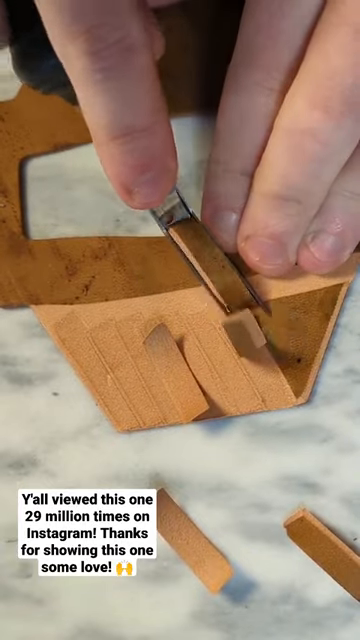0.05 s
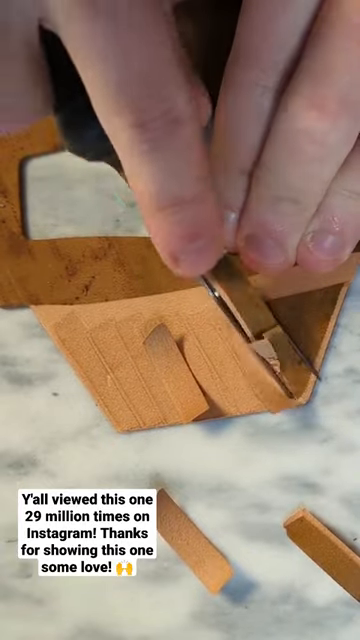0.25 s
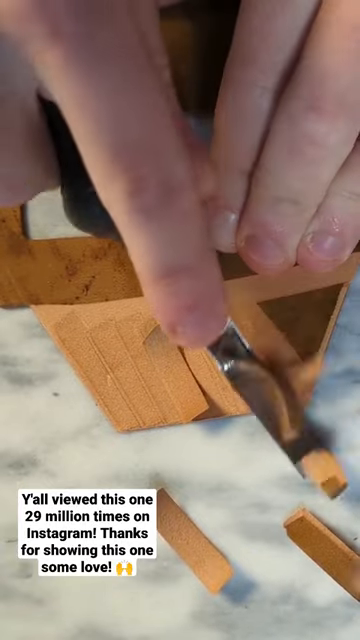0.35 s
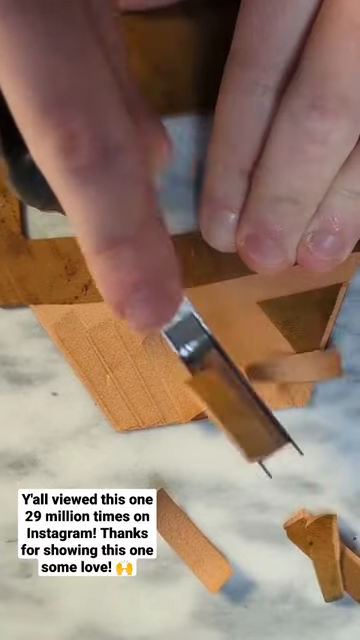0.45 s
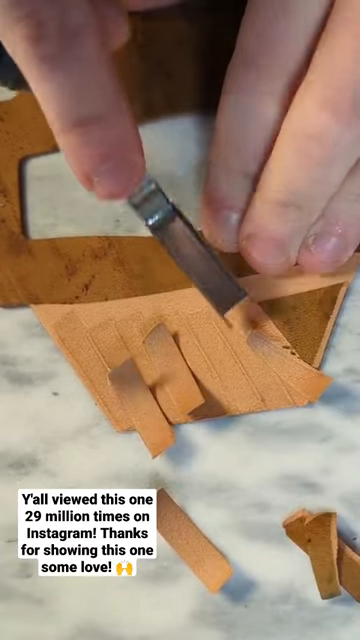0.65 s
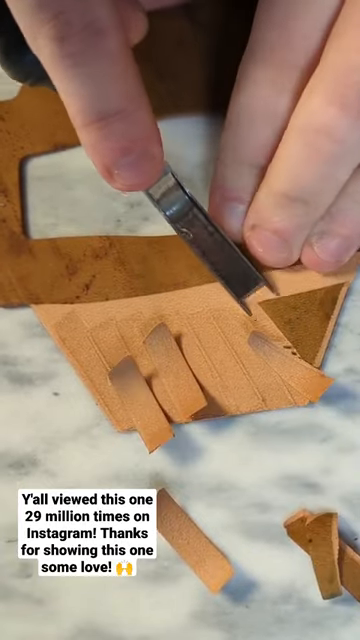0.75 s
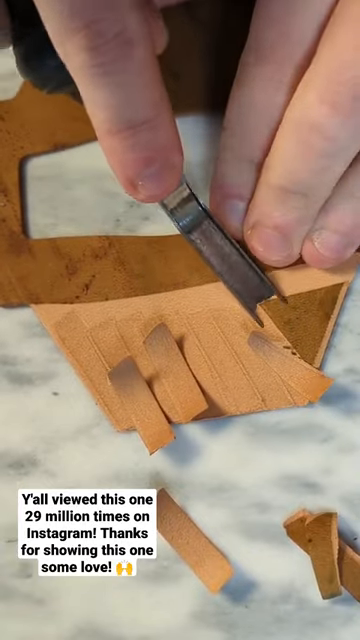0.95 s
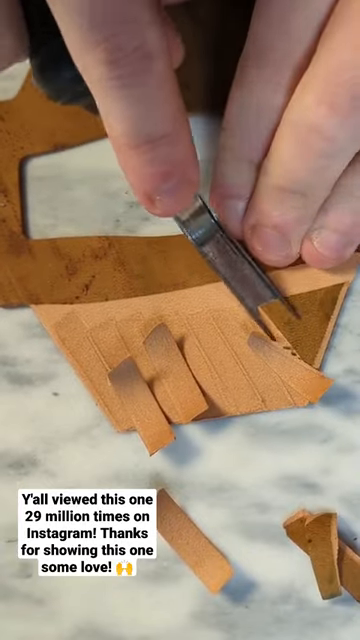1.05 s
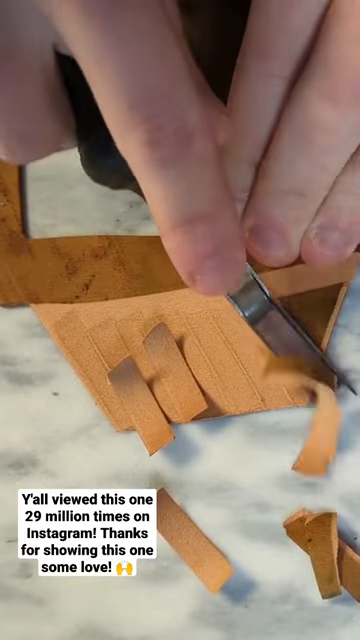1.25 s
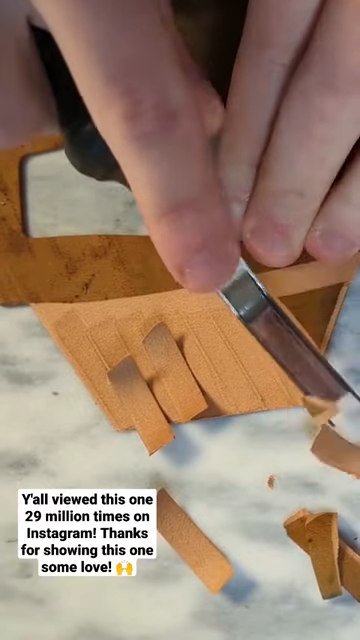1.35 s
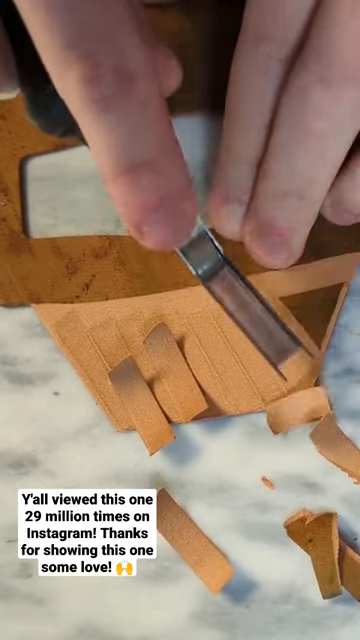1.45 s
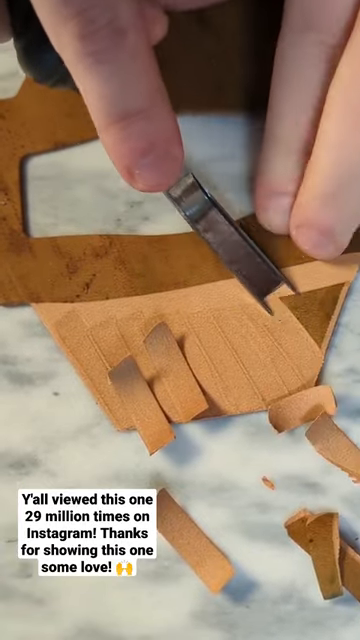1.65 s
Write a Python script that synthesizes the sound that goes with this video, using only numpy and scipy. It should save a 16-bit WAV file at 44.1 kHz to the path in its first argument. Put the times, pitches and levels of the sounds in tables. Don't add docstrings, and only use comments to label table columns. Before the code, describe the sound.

Two rasping pushes of a sharp blade cutting leather on a stone slab, ringing faintly

```python
import sys
import numpy as np
from scipy import signal
from scipy.fft import rfft, irfft
from scipy.io import wavfile

SR = 44100
rng = np.random.default_rng(int(sys.argv[2]) if len(sys.argv) > 2 else 0)


def volts_from_db(level):
    exponent = np.asarray(level, float) / 20
    return 10 ** exponent


def inscribe(sig):
    pcm = np.round(np.clip(np.atleast_2d(sig).T, -1, 1) * 32767)
    wavfile.write(sys.argv[1], SR, pcm.astype(np.int16))


N = 74970
T = np.arange(N) / SR

SLAB_PITCHES = [578, 612, 695, 980, 1325, 1526, 1575, 1865, 1964, 2112, 2840, 3025, 3066, 3280]
# [level/dB, t60/s]
SLAB_MODES = [(-13, 0.061), (-10, 0.048), (-17.5, 0.033), (-21, 0.063), (-21.5, 0.13), (-9, 0.083),
              (-11, 0.063), (-18, 0.067), (-24, 0.3), (-31, 0.05), (-28.5, 0.035), (-21.5, 0.082),
              (-21, 0.072), (-24.5, 0.02)]
BLADE_PITCHES = [4645, 6050, 7715, 8905, 9105, 9445, 10600, 12300]
# [level/dB, t60/s]
BLADE_MODES = [(-7.5, 0.09), (-6.5, 0.061), (-8.5, 0.05), (-13.5, 0.07), (-2.5, 0.043), (-7.5, .07),
               (-9, 0.034), (-1, 0.0056)]
# [f/Hz, density/dB per Hz]
HISS_COLOUR = [(560, -5), (1500, 4), (2600, 1), (4000, -3.5), (8500, -4.5), (10100, -11), (12500, -6),
               (14100, -14)]
HISS_DB, BLADE_DB = 7, -3
EDGE_HZ = 14150


def rms_one(x):
    return x / np.sqrt(np.mean(x ** 2) + 1e-20)


def cut(x, hz, kind, order=2):
    return signal.sosfilt(signal.butter(order, np.clip(hz, 10, .45 * SR), kind, fs=SR, output="sos"), x)


def steep(x, hz):
    return signal.sosfilt(signal.ellip(10, .5, 55, hz, fs=SR, output="sos"), x)


def drift(hz):
    return rms_one(cut(rng.standard_normal(N + 9999), hz, "low")[9999:])


def colour(x, points):
    hz = np.maximum(np.arange(N // 2 + 1) * SR / N, 1)
    p = np.array(points)
    gain = volts_from_db(np.interp(np.log(hz), np.log(p[:, 0]), p[:, 1]))
    gain = gain * np.minimum(hz / p[0, 0], 1) ** 4.1
    return irfft(rfft(x) * gain / np.sqrt(np.mean(gain ** 2)), N)


def ring(force, pitches, modes):
    out = np.zeros(N)
    for k, (hz, (db, t60)) in enumerate(zip(pitches, modes)):
        r = volts_from_db(-60 / (t60 * SR))
        w = 2 * np.pi * hz / SR
        b = (1 - r * r) ** .5 * 2 ** .5 * np.sin(w) * volts_from_db(db) * (-1) ** k
        out += signal.lfilter([0, b], [1, -2 * r * np.cos(w), r * r], force + 1e-18)
    return out


def rumble():
    # [f/Hz, density/dB per Hz]
    murmur_colour = [(45, -12), (70, 1), (240, -4), (560, -20), (1000, -25), (3000, -30.5), (8000, -45),
                     (15600, -51.5)]
    hum_hz, hum_width_hz, hum_db = 240.8, 4.7, -76
    hum_band = [hum_hz - hum_width_hz / 2, hum_hz + hum_width_hz / 2]
    hum = rms_one(cut(rng.standard_normal(N), hum_band, "band"))
    murmur = rms_one(colour(rng.standard_normal(N), murmur_colour))
    sway = volts_from_db(.8 * drift(hz=5))
    return volts_from_db(-59.5) * murmur * sway + volts_from_db(hum_db) * hum


def tearing():
    tears_per_s, spread_db, flutter_db, flutter_hz = 5000, 2.2, 0.5, 40
    sizes = volts_from_db(spread_db * np.minimum(rng.exponential(1, N), 5)) * rng.choice([-1, 1], N)
    snaps = rng.random(N) < tears_per_s / SR
    return rms_one(sizes * snaps * volts_from_db(flutter_db * drift(flutter_hz)))


def stroke_gain(axis):
    # [t/s, cutting effort/dB, pressure on the slab/dB]
    strokes = [
        [(0.13, -110, -83), (0.178, -88, -56), (0.222, -74.5, -48.5), (0.298, -67, -44.5), (0.348, -65.5, -42),
         (0.386, -63.5, -42.5), (0.452, -63, -40), (0.468, -60, -54), (0.476, -67, -37)],
        [(1.07, -103, -74.5), (1.156, -80.5, -49), (1.164, -82, -56), (1.256, -64.5, -39), (1.274, -65, -42),
         (1.314, -64, -42), (1.364, -63.5, -43), (1.374, -62.5, -48.5), (1.44, -84.5, -63.5)],
    ]
    total = 0
    for stroke in strokes:
        points = np.array(stroke)
        total = total + volts_from_db(np.interp(T, points[:, 0], points[:, axis], left=-200, right=-200))
    return total


def cutting():
    effort, pressure = stroke_gain(axis=1), stroke_gain(axis=2)
    hiss = volts_from_db(HISS_DB) * effort * colour(tearing(), HISS_COLOUR)
    blade = volts_from_db(BLADE_DB) * ring(effort * tearing(), BLADE_PITCHES, BLADE_MODES)
    slab = ring(pressure * tearing(), SLAB_PITCHES, SLAB_MODES)
    return hiss + blade + volts_from_db(2.57) * cut(slab, 530, "high", order=4)


def catches():
    # [slab mode number, level over the pressure/dB]
    singing = [(4, -14), (5, -20.5), (7, -12), (8, -17.5), (11, -22.5)]
    # [t/s, slab mode number, peak level/dB, t60/s]
    snags = [(0.17, 1, -50, 0.087), (0.29, 5, -34, 0.11), (0.365, 5, -35.5, 0.45), (0.398, 5, -43, 0.048),
             (0.457, 5, -33.5, 0.47), (0.251, 11, -52.5, 0.18), (0.21, 5, -56, 0.076),
             (0.201, 7, -52.5, 0.9), (0.262, 5, -46, 0.14), (0.33, 5, -34, 0.045), (0.4, 7, -44, 0.27),
             (0.432, 5, -45.5, 0.3), (0.48, 4, -63, 1), (0.874, 4, -61, 0.44), (1.229, 5, -34.5, 0.083),
             (1.349, 7, -41.5, 0.25), (1.365, 8, -42, 0.18), (1.537, 5, -60, 0.3), (0.205, 11, -65, 0.15),
             (1.096, 1, -51.5, 0.12), (1.12, 5, -50, 0.11), (1.15, 1, -41, 0.084), (1.245, 0, -41.5, 0.19),
             (1.286, 5, -30.5, 0.13), (1.309, 5, -31.5, 0.083), (1.333, 5, -33, 0.11),
             (1.343, 11, -52, 0.29), (1.366, 5, -31, 0.17), (1.39, 11, -52, 0.29)]
    lag_hz, wander_db, wander_hz, slur_rad = 8.9, 4.5, 20.4, 0.28
    rise_s, grip_db_per_s2 = 0.003, 350
    pressure = cut(stroke_gain(axis=2), lag_hz, "low", order=1)
    size = np.zeros((len(SLAB_PITCHES), N))
    for mode, db in singing:
        size[round(mode)] += pressure * volts_from_db(db + wander_db * drift(wander_hz))
    for s, mode, db, t60 in snags:
        t = np.maximum(T - s, 0)
        swell = (1 - np.exp(-t / rise_s)) ** 2
        size[round(mode)] += swell * volts_from_db(db - 60 * t / t60 - grip_db_per_s2 * t ** 2)
    out = np.zeros(N)
    for a, hz in zip(size, SLAB_PITCHES):
        if a.any():
            out += a * np.sin(2 * np.pi * hz * T + slur_rad * drift(wander_hz))
    return out


def leans():
    # [t/s, level/dB, length/s]
    shifts = [
        (0.303, -67.5, 0.12),
        (0.404, -69, .05),
        (0.574, -61, 0.031),
        (1.124, -60, 0.02),
        (1.498, -61, 0.045),
        (1.646, -65.5, 0.12),
    ]
    swell = sum(volts_from_db(db) * np.exp(-((T - s) / span) ** 2) for s, db, span in shifts)
    return swell * rms_one(cut(rng.standard_normal(N), [241, 389], "band"))


def squeaks():
    # [t/s, length/s, level/dB]
    exits = [
        (0.441, 0.031, -51.5),
        (1.371, 0.03, -59),
    ]
    centre_hz, half_width_hz, ramp_s = 12570, 770, 0.0016
    gate = 0
    for s, span, db in exits:
        gate = gate + volts_from_db(db) * np.clip(np.minimum(T - s, s + span - T) / ramp_s, 0, 1)
    band = [centre_hz - half_width_hz, centre_hz + half_width_hz]
    return gate * rms_one(cut(tearing(), band, "band", order=3))


def rustle():
    start_s, level_db, t60_s, settle_db_per_s2 = .474, -62.5, 0.39, 702
    t = np.maximum(T - start_s, 0)
    fade = (T > start_s) * volts_from_db(level_db - 60 * t / t60_s - settle_db_per_s2 * t ** 2)
    stir = fade * tearing()
    slab = volts_from_db(15.5) * ring(stir, SLAB_PITCHES[9:], SLAB_MODES[9:])
    blade = volts_from_db(BLADE_DB) * ring(stir, BLADE_PITCHES, BLADE_MODES)
    hiss = fade * volts_from_db(HISS_DB) * colour(tearing(), HISS_COLOUR)
    return hiss + slab + blade


def taps():
    # [t/s, crack level/dB, knock level/dB, length/s]
    contacts = [(0.486, -29.5, -54, 0.0038), (0.64, -83, -56.5, 0.0083), (0.808, -75, -61.5, 0.037),
                (0.871, -50.5, -45, 0.0072), (0.877, -64, -57, 0.007), (0.937, -67, -59.5, 0.014),
                (1.466, -56, -65, 0.015), (1.476, -71, -54.5, 0.03), (1.533, -70, -54.5, 0.019),
                (1.599, -66, -61.5, 0.038), (1.655, -85, -61.5, 0.021), (1.675, -64, -65.5, 0.04)]

    def bursts(axis):
        envelope = 0
        for row in contacts:
            rise = np.clip((T - row[0]) / (0.29 * row[3]), 0, 1)
            decay = np.exp(-2 * np.maximum(T - row[0], 0) / row[3])
            envelope = envelope + volts_from_db(row[axis]) * rise * decay
        return envelope * rng.standard_normal(N)

    crack, knock = bursts(axis=1), bursts(axis=2)
    snap = cut(crack, [2850, 9200], "band", order=1)
    thud = ring(knock, [612, 1600, 2996], [(5.5, 0.05), (-2, 0.0063), (-6, 0.004)])
    blade = volts_from_db(-13) * ring(crack, BLADE_PITCHES, BLADE_MODES)
    slab = volts_from_db(-6) * ring(knock, SLAB_PITCHES, SLAB_MODES)
    return snap + blade + thud + slab


def whistle(x):
    bright = np.abs(cut(x, 11000, "high")) * (T > .487)
    follow = cut(bright, 25, "low", order=1)
    return volts_from_db(-5) * follow * np.sin(2 * np.pi * 13954 * T)


def room(x):
    t60_s, gap_s, wall_cut_hz = 0.27, .004, 6000
    t = T[:SR // 2]
    tail = rng.standard_normal(len(t)) * volts_from_db(-60 * t / t60_s) * (t > gap_s)
    tail = tail / np.sqrt(np.sum(tail ** 2))
    return signal.fftconvolve(x, cut(tail, wall_cut_hz, "low", order=1))[:N]


def scene():
    touches = taps()
    bench = cutting() + squeaks() + touches + rustle()
    heard = steep(bench + volts_from_db(-6) * room(bench), EDGE_HZ)
    heard = heard + volts_from_db(2) * cut(touches, EDGE_HZ, "high", order=6)
    return (heard + catches() + whistle(heard) + rumble() + leans())[None]


def top_cut(x):
    return signal.sosfilt(signal.butter(12, 15700, fs=SR, output="sos"), x)


def record(dry):
    return top_cut(steep(dry, 15700))


dry = scene()
out = record(dry)
inscribe(out)
```